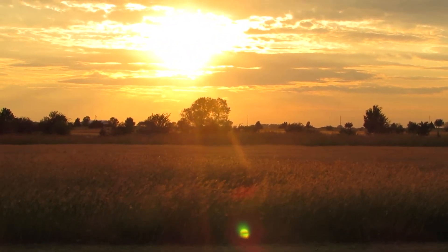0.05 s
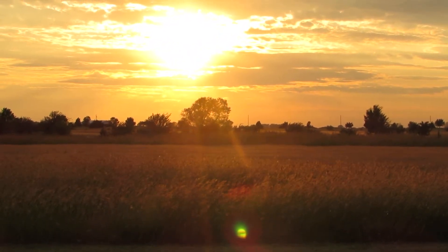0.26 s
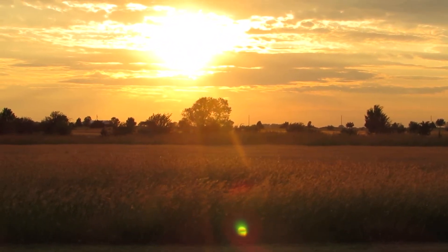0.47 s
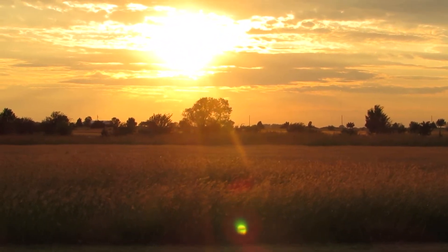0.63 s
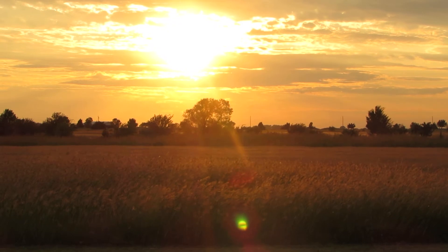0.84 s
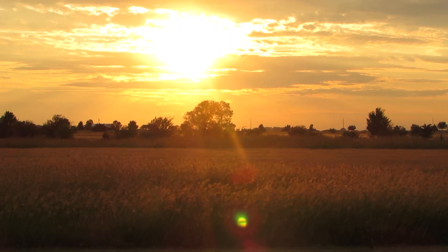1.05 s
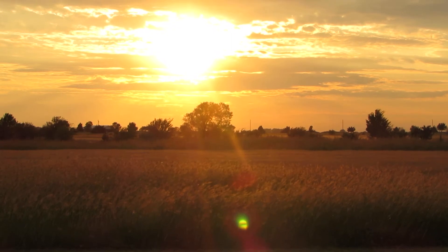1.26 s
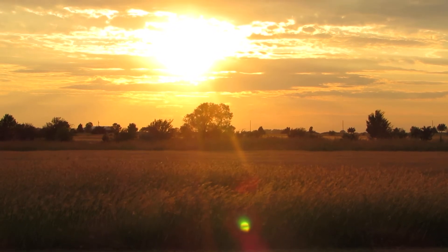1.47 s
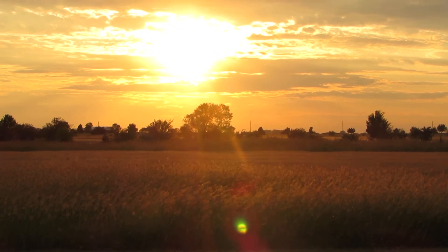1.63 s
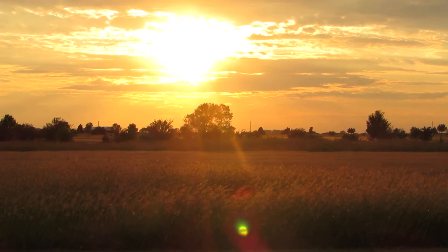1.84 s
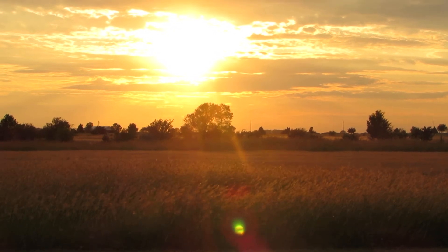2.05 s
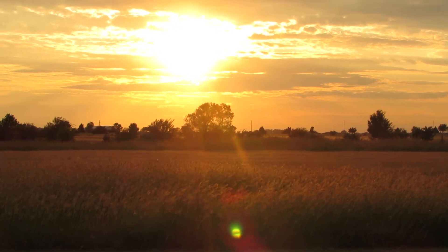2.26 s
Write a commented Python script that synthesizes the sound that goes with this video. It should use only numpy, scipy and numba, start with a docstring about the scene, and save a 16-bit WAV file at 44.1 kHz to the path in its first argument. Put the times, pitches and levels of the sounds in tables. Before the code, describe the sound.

Gusty wind buffets the microphone with low thumps and rumble over an open field.

```python
"""Wind over an open field of tall grass. From the start: a deep rumble, a far murmur of air, hissing grass,
a thin rising hum, a faint camera whine and one faint insect chirping with its wings. From 0.2 s eddies
buffet the microphone in short low thumps, pushing its two channels in opposite directions; from 0.5 s the
hardest thud and crack. Handling ticks come at 0.8-1.1 s. The buffets peak near 1.3 s and die away by 2.3 s;
after the hardest, the camera's limiter ducks everything."""
import sys
import numpy as np
from scipy import signal
from scipy.fft import rfft, irfft
from scipy.io import wavfile
from scipy.ndimage import uniform_filter1d, minimum_filter1d
from numba import njit

SR = 44100
rng = np.random.default_rng(int(sys.argv[2]) if len(sys.argv) > 2 else 0)


def log_audio(samples):
    """Write samples as a 16-bit WAV file to the path given in sys.argv[1]."""
    # one column per channel
    frames = np.atleast_2d(samples).T
    # limit to full scale, then quantise
    limited = np.clip(frames, -1, 1)
    pcm = np.round(limited * 32767).astype(np.int16)
    wavfile.write(sys.argv[1], SR, pcm)


N = 105840
T = np.arange(N) / SR
SIDES = np.array([[1], [-1]])  # left, right


def from_db(db):
    """Decibels to gain."""
    return 10 ** (np.asarray(db) / 20)


def rms_one(x):
    """Scale to unit rms."""
    return x / np.sqrt(np.mean(x ** 2) + 1e-20)


def level(rows):
    """Gain over time from rows of (time [s], level [dB])."""
    return from_db(np.interp(T, *np.transpose(rows)))


def at_hz(points, hz):
    """Interpolate rows of (frequency [Hz], value) on a log-frequency axis."""
    f, value = np.transpose(points)
    return np.interp(np.log(hz + 1), np.log(f), value)


def smooth(x, seconds):
    """Bell-shaped moving average."""
    for _ in range(3):
        x = uniform_filter1d(x, max(int(seconds * SR), 1))
    return x


def band_noise(hz, width_hz):
    """Stereo noise in one resonance; rms 1."""
    edges_hz = np.clip([hz - width_hz / 2, hz + width_hz / 2], 20, 20000)
    band = signal.butter(2, edges_hz, "band", fs=SR, output="sos")
    return rms_one(signal.sosfilt(band, rng.standard_normal((2, N))))


def wide_noise(spectrum, correlation, pan_db):
    """Stereo noise of given spectrum and left-right correlation; positive pan is left; rms 1."""
    hz = np.arange(N // 2 + 1) * SR / N
    mid, side = rfft(rng.standard_normal((2, N))) * from_db(at_hz(spectrum, hz))
    alike = np.clip(at_hz(correlation, hz), -1, 1)
    stereo = irfft(np.sqrt(1 + alike) * mid + SIDES * np.sqrt(1 - alike) * side, N)
    return rms_one(stereo * from_db(SIDES * pan_db))


def flutter(seconds, depth_db):
    """Randomly wavering gain."""
    drift = smooth(rng.standard_normal(2 * N), seconds)[N // 2:N // 2 + N]
    return from_db(depth_db * rms_one(drift))


@njit
def moving_lowpass(x, step, order):
    """Chain of one-pole low-passes with a moving corner."""
    out, state = np.empty(len(x)), np.zeros(order)
    for i in range(len(x)):
        v = x[i]
        for k in range(order):
            state[k] += step[i] * (v - state[k])
            v = state[k]
        out[i] = v
    return out


def deep_rumble(drone_hz=30.2):
    """Low noise and a far drone at the bottom of hearing."""
    # rumble spectrum: (frequency [Hz], relative density [dB])
    spectrum = [(12, -18.5), (22, 7), (30, -8), (38, -8.5), (60, -11.5), (90, -13.5), (200, -26),
                (600, -71.5)]
    # drone envelope: (time [s], level [dB])
    drone_level = [(0, -44), (.35, -38), (1.2, -48), (2.4, -50)]
    rumble = from_db(-43) * wide_noise(spectrum, [(30, 0.43)], pan_db=-4.0)
    drone = np.sqrt(2) * np.sin(2 * np.pi * drone_hz * T)
    return rumble + level(drone_level) * flutter(0.037, depth_db=0.5) * drone


def far_air():
    """Distant murmur of moving air."""
    # murmur spectrum: (frequency [Hz], relative density [dB])
    spectrum = [(40, 0.5), (120, 1.5), (220, 0.5), (370, -9.5), (520, -6.5), (640, -7.5), (850, -8.5),
                (1030, -12), (1400, -16), (2000, -19), (2700, -29), (5000, -72), (15000, -48)]
    # murmur envelope: (time [s], level [dB])
    air_level = [(0, -48.5), (.5, -48.5), (.7, -48), (.98, -52), (1.2, -50), (1.55, -52), (2.0, -51.5),
                 (2.4, -50.5)]
    gain = level(air_level) * flutter(0.038, depth_db=0.5)
    return gain * wide_noise(spectrum, [(1000, 0.28)], pan_db=0.9)


def rustle():
    """Soft midrange noise that swells and passes."""
    # rustle spectrum: (frequency [Hz], relative density [dB])
    spectrum = [(700, -22), (1100, 3), (1400, 11), (1750, -2.5), (2600, -27.5)]
    # rustle envelope: (time [s], level [dB])
    rustle_level = [(0, -65.5), (.5, -58.5), (.95, -58.5), (1.25, -73), (2.4, -65.5)]
    return level(rustle_level) * wide_noise(spectrum, [(1000, 0.67)], pan_db=3.0)


def grass():
    """Grass hissing in the wind, slightly right, with two narrow ringing bands."""
    # hiss spectrum: (frequency [Hz], relative density [dB])
    spectrum = [(800, -16), (2000, -8.5), (3000, -4), (3400, -2.5), (3750, 0.5), (4200, -3), (4750, -2.5),
                (5000, 0), (5300, 3.5), (5850, -2), (6500, -10), (7500, -10), (8300, -14), (10500, -16.5),
                (14000, -17), (15200, -56)]
    # stereo likeness of the hiss: (frequency [Hz], left-right correlation [-1..1])
    correlation = [(2000, -0.6), (3400, 0.49), (5500, 0.31), (8000, -0.23), (14000, 0.44)]
    # envelopes of hiss, upper band and lower band: (time [s], level [dB])
    hiss_level = [(0, -58.5), (.45, -57), (.65, -58), (.9, -59.5), (1.28, -59.5), (1.45, -61.5),
                  (1.65, -60), (1.85, -63.5), (2.15, -62.5), (2.4, -62.5)]
    high_ring_level = [(0, -64), (.2, -72), (.4, -84), (1.1, -78), (1.22, -65), (1.32, -85), (2.4, -80)]
    low_ring_level = [(0, -72), (.45, -66.5), (.56, -73), (.73, -78), (.82, -65.5), (1.05, -78),
                      (1.26, -63), (1.45, -85), (1.75, -67.5), (2.05, -89), (2.4, -69)]
    gain = level(hiss_level) * flutter(0.0067, depth_db=.5)
    hiss = gain * wide_noise(spectrum, correlation, pan_db=-1.1)
    high_ring = level(high_ring_level) * band_noise(hz=4190, width_hz=240)
    band = band_noise(hz=3380, width_hz=174)
    low_ring = level(low_ring_level) * rms_one(band + .5 * band[::-1])  # channels partly mixed
    left, right = hiss + high_ring + low_ring
    return np.array([np.roll(left, 1), right])  # left lags one sample


def far_hum(width_hz=58):
    """Wavering far tone that creeps up in pitch, perhaps tyres on a road."""
    # hum track: (time [s], pitch [Hz], level [dB])
    track = [(0, 776, -71.5), (.7, 805.6, -63.5), (1.249, 820.6, -66.5), (1.7, 860.7, -64.5),
             (2.1, 856, -62.5), (2.4, 865, -62)]
    s, hz, db = np.transpose(track)
    in_phase, quadrature = rms_one(smooth(rng.standard_normal((2, N)), .5 / width_hz))
    phase = 2 * np.pi * np.cumsum(np.interp(T, s, hz)) / SR
    return from_db(np.interp(T, s, db)) * (in_phase * np.cos(phase) + quadrature * np.sin(phase))


def motor_whine(motor_hz=354.5):
    """Steady upper harmonics of the camera motor."""
    # motor harmonics: (multiple [-], rms level [dB])
    harmonics = [(5, -79), (6, -83), (7, -87.5), (8, -85.5)]
    return sum(from_db(db) * np.sqrt(2) * np.sin(2 * np.pi * (k * motor_hz * T + rng.random()))
               for k, db in harmonics)


def insect(strokes=7, stroke_rate_hz=108, stroke_half_s=0.0033, sag_hz_per_s=50000, pan_db=3.5):
    """Each chirp is a run of wing strokes, each a near-pure tone that sags in pitch."""
    # chirps: (centre time [s], nominal level [dB], pitch [Hz])
    chirps = [(.048, -80, 9500), (.85, -85, 9000), (1.065, -80, 9200), (1.33, -79, 9000),
              (1.587, -76.5, 8950), (1.881, -77, 8950), (2.165, -78, 8900), (2.386, -83, 9100)]
    out = np.zeros(N)
    for s, db, hz in chirps:
        for k in np.arange(strokes) - (strokes - 1) / 2:
            t = T - s - k / stroke_rate_hz
            near = np.abs(t) < 1 / stroke_rate_hz
            t = t[near]
            turns = (hz + rng.normal(0, 110)) * t - sag_hz_per_s * t ** 2 / 2 + rng.random()
            envelope = 2 * from_db(db + rng.normal(0, 1.3)) * np.exp(-np.square(t / stroke_half_s))
            out[near] += envelope * np.sin(2 * np.pi * turns)
    return out * from_db(SIDES * pan_db)


def turbulence(corner_hz, port_low_hz=43.2, port_high_hz=1070, even_s=.018):
    """Lumpy pressure of even strength at the microphone port, falling steeply above a moving corner."""
    highpass = signal.butter(2, port_low_hz, "high", fs=SR, output="sos")
    lowpass = signal.butter(6, port_high_hz, fs=SR, output="sos")
    noise = signal.sosfilt(lowpass, signal.sosfilt(highpass, rng.standard_normal(N)))
    step = 1 - np.exp(-2 * np.pi * corner_hz / SR)
    lumps = moving_lowpass(noise / np.sqrt(corner_hz), step, order=5)
    local_power = smooth(np.abs(signal.hilbert(lumps)) ** 2, even_s) / 2
    return lumps / np.sqrt(local_power)


def wind_on_microphone(flow_corner_hz=131.6, pan_db=1.0, common_db=-16.5):
    """Each eddy swells and brightens the turbulence; the channels swing against each other."""
    # steadier flow between eddies: (time [s], level [dB])
    flow = [(0, -40.5), (.13, -46.5), (.17, -26.5), (.6, -25), (1.0, -29), (1.1, -36.5), (1.25, -19),
            (1.55, -28), (1.8, -36), (2.28, -35), (2.4, -53)]
    # eddies hitting the microphone: (time [s], level [dB], half length [s], corner [Hz])
    buffets = [(0.206, -23.5, 0.024, 225), (0.35, -16, 0.015, 202), (0.44, -18, 0.0065, 157),
               (0.497, -15.5, 0.01, 172), (0.524, -8.5, 0.0089, 225), (.539, -7.5, 0.005, 235),
               (0.659, -11.5, 0.0042, 333), (0.675, -8.5, 0.025, 250.4), (0.752, -11, 0.008, 276),
               (0.833, -20.5, 0.0093, 268), (0.936, -14.5, 0.0085, 180), (0.968, -13.5, 0.0065, 263),
               (1.04, -13.5, 0.013, 185), (1.186, -12, 0.018, 194), (1.24, -16.5, 0.01, 373),
               (1.262, -11.5, 0.012, 259), (1.312, -8, 0.0096, 252), (1.324, -5, 0.0055, 680),
               (1.345, 1.5, 0.0035, 224), (1.381, -11.5, 0.018, 295), (1.454, -12, 0.0025, 503),
               (1.47, -6, 0.01, 245), (1.575, -21, 0.035, 259), (1.654, -24, 0.05, 194),
               (1.737, -14, 0.0055, 171), (1.859, -5.5, 0.0024, 410), (1.882, -11, 0.007, 230),
               (1.895, -17.5, 0.0058, 288), (1.975, -23.5, 0.021, 147), (2.11, -18.5, 0.018, 184),
               (2.251, -24.5, 0.019, 164)]
    power = level(flow) ** 2
    weighted_corner = power * flow_corner_hz
    for s, db, half_s, hz in buffets:
        offset = np.clip((T - s) / half_s, -20, 20)
        eddy_power = (from_db(db) / np.cosh(offset * np.sqrt(2))) ** 2
        power += eddy_power
        weighted_corner += eddy_power * hz
    corner_hz = weighted_corner / power
    opposed = (np.sqrt(power) * turbulence(corner_hz) + thuds()) * SIDES * from_db(SIDES * pan_db)
    common = np.sqrt(power) * from_db(common_db) * turbulence(corner_hz)
    return opposed + common


def cracks(half_s=0.0015):
    """The microphone cracks briefly as a hard buffet crests."""
    # cracks: (time [s], level [dB])
    crests = [(0.5223, -33), (1.326, -34.5), (1.3311, -38.5), (1.383, -41.5)]
    # crack spectrum: (frequency [Hz], relative density [dB])
    spectrum = [(300, -29), (1000, 7), (2200, -7), (4000, -12), (10000, -16), (15000, -22)]
    bursts = sum(from_db(db) * np.exp(-np.square((T - s) / half_s)) for s, db in crests)
    return bursts * wide_noise(spectrum, [(1000, -0.86)], pan_db=1.0)


def thuds():
    """An eddy's core sucks at the microphone, with a softer push before and after."""
    # low-pressure cores: (time [s], peak [dB], half length [s])
    cores = [(0.523, -2, 0.0038), (0.964, -1.5, 0.0031), (1.248, -0.5, 0.0025), (1.325, -0.5, 0.0037),
             (1.38, -2, 0.0041), (1.861, -3.5, 0.0057), (2.112, -7, 0.0062)]
    out = np.zeros(N)
    for s, db, half_s in cores:
        offset_squared = np.square((T - s) / half_s)
        out += from_db(db) * (2 * offset_squared - 1) * np.exp(-offset_squared)
    return out


def handling_ticks():
    """Handling the camera excites brief, decaying resonances."""
    # ticks: (time [s], level [dB], centre [Hz], width [Hz], decay [s])
    ticks = [(0.8, -50.5, 7100, 2300, 0.005), (0.936, -53, 1970, 410, 0.012),
             (0.963, -44.5, 1300, 870, 0.0036), (1.08, -46, 1840, 492, 0.0052)]
    out = np.zeros((2, N))
    for s, db, hz, width_hz, decay_s in ticks:
        envelope = from_db(db) * (T > s) * np.exp(-np.abs(T - s) / decay_s)
        out += envelope * band_noise(hz, width_hz)
    return out


def scene():
    """Wind on the microphone, the field behind it, and the camera's own noises."""
    wind = wind_on_microphone() + cracks()
    field = deep_rumble() + far_air() + rustle() + grass() + far_hum() + insect()
    camera = handling_ticks() + motor_whine()
    return wind + field + camera


def record(dry):
    """The recorder's notch filters, a slowly recovering look-ahead limiter, and a steep top cut."""
    # notch filters against motor noise, two narrow dips in the hiss: (frequency [Hz], Q [-])
    notches = [(3920, 13.3), (7880, 45)]
    ceiling, window_s, release_db_per_s = .96, .012, 8.5
    cutoff_hz = 15600
    for hz, q in notches:
        dry = signal.lfilter(*signal.iirnotch(hz, q, fs=SR), dry)
    crest = -minimum_filter1d(-np.abs(dry).max(axis=0), int(window_s * SR))  # running maximum
    over_db = 20 * np.log10(np.maximum(crest / ceiling, 1))
    held_db = np.maximum.accumulate(over_db + release_db_per_s * T) - release_db_per_s * T
    limited = dry * from_db(-smooth(held_db, window_s / 3))
    return signal.sosfilt(signal.ellip(10, .05, 70, cutoff_hz, fs=SR, output="sos"), limited)


dry = scene()
out = record(dry)
log_audio(out)
```